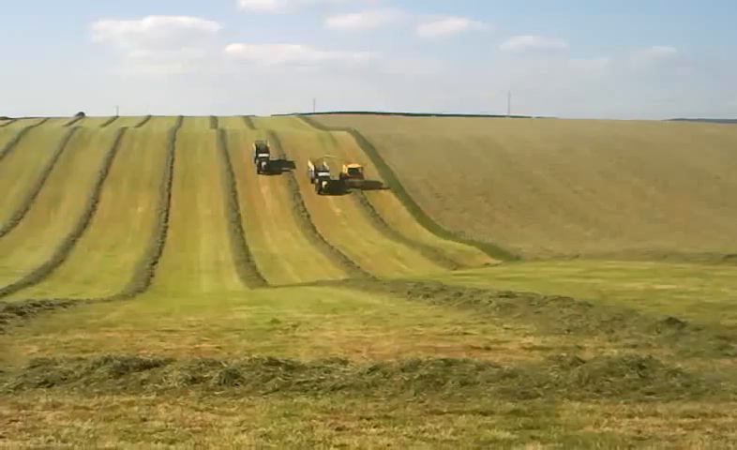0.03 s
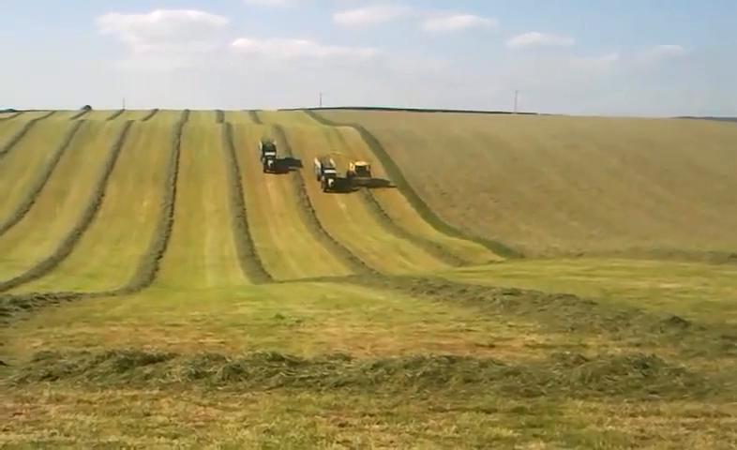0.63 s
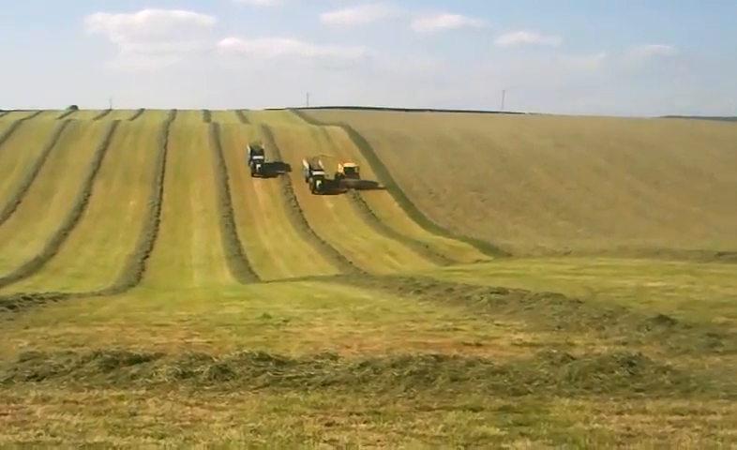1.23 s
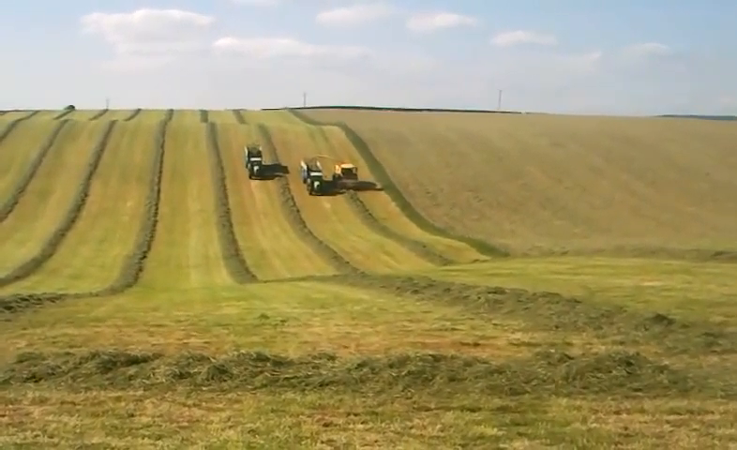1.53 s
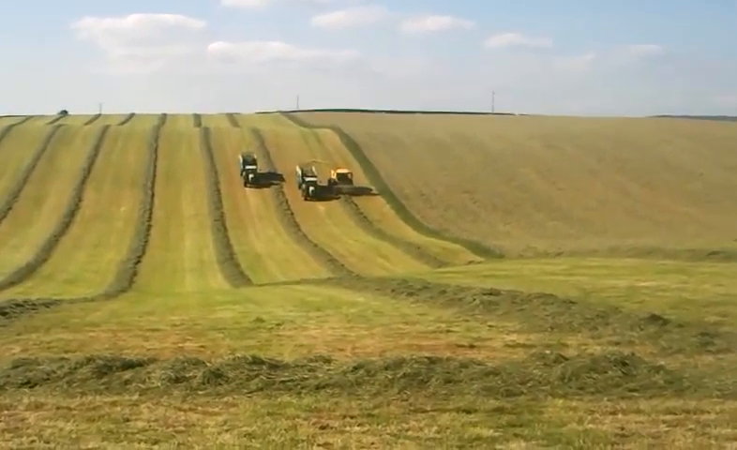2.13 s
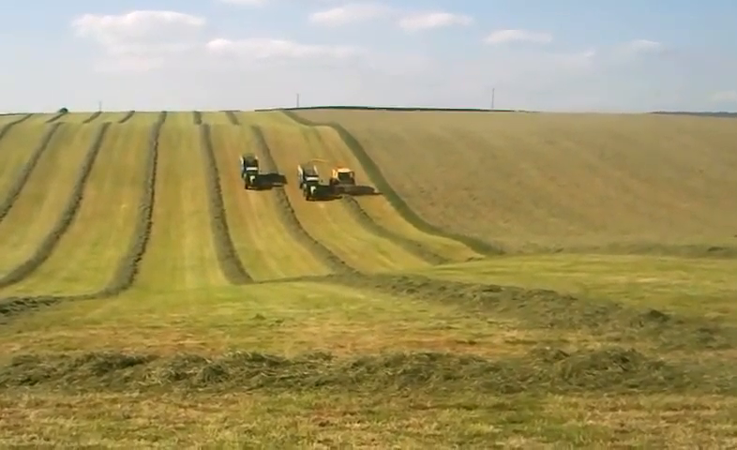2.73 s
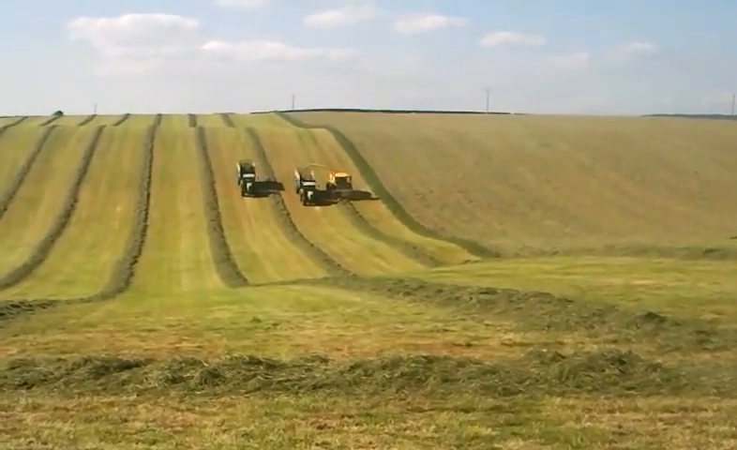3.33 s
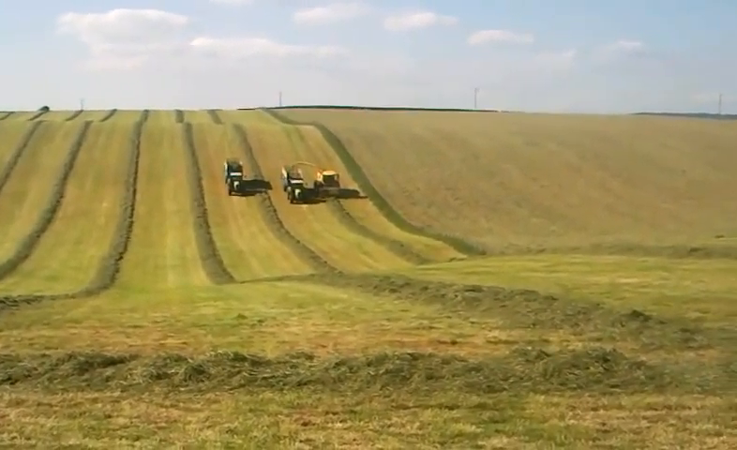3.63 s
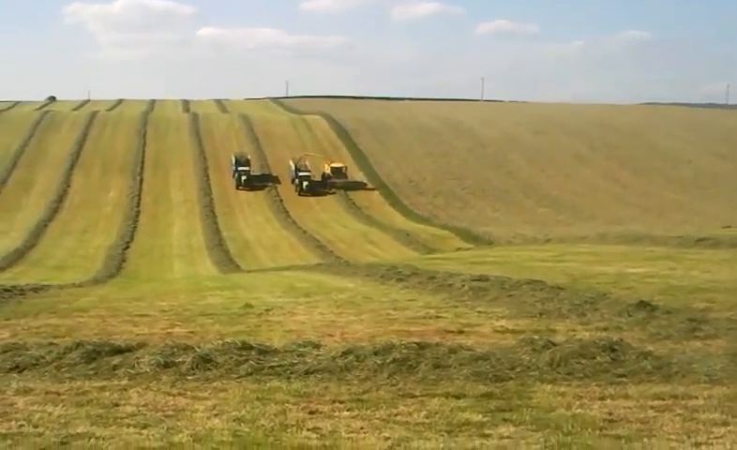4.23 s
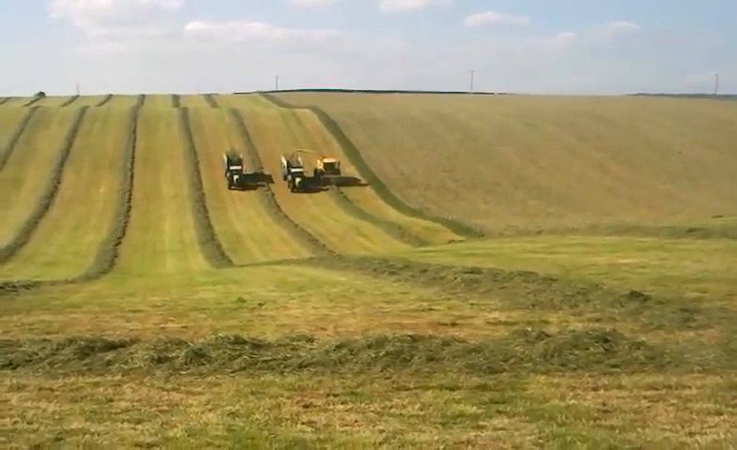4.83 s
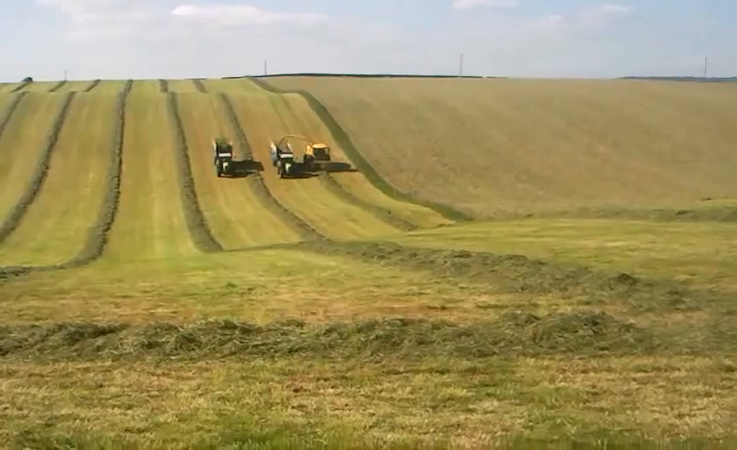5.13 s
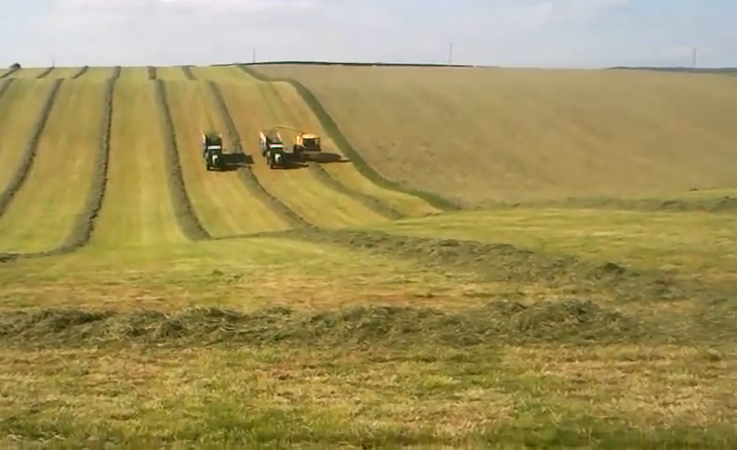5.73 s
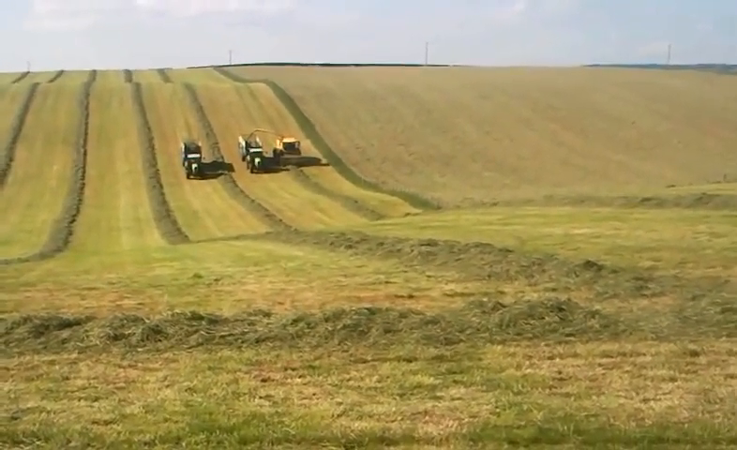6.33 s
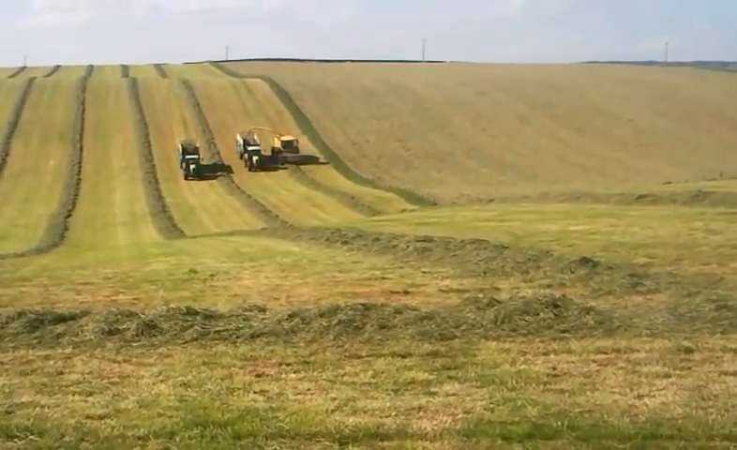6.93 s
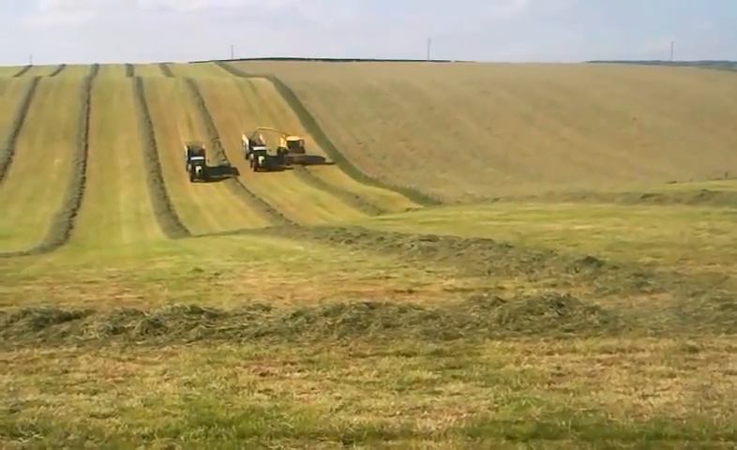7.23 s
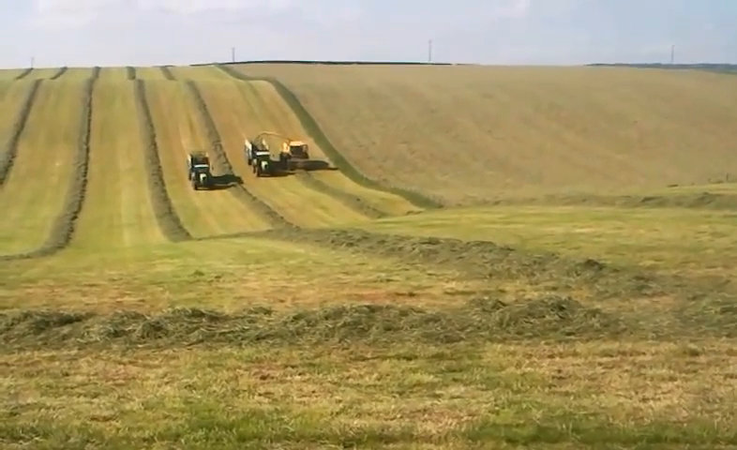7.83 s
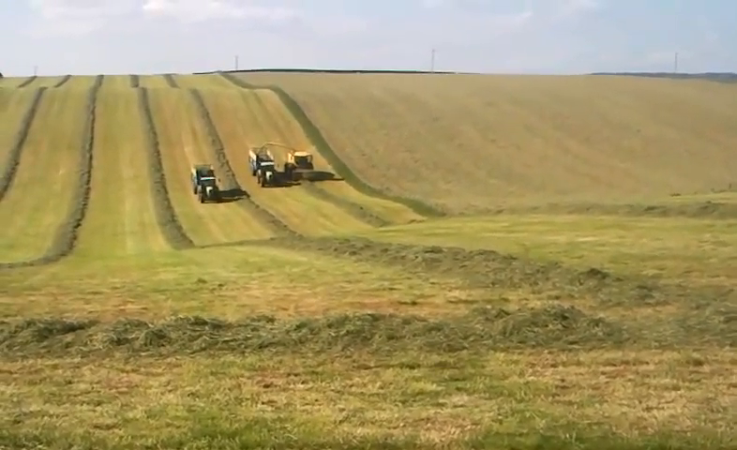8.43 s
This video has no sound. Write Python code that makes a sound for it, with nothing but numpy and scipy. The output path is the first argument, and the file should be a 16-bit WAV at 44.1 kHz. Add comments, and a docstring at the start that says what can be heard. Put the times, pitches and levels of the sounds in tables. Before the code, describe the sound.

A loud, brief pop with a crackle opens the sound as the microphone comes on. From then until the end, at about 8.5 seconds, two machines run over a steady low rumble in an open field. Close by, a diesel engine idles evenly, throbbing about seven times a second with a soft clatter, valve rattle and faint gear whine. Far off, a forage harvester chops grass: its engine drones, its cutter drum hums, and a rushing roar flutters, swelling and fading in the moving air. The harvester's tones repeatedly sag in pitch under load and recover, most deeply around 1 and 6.5 seconds. A higher blower note swells out around 3 to 3.6 seconds, and briefly near 4.1 and 8.2 seconds. The knives' whine stands out a little around 5 seconds. The sound is mono and narrow, with little treble.

```python
"""Distant forage harvester, diesel idling nearby

Far off on a grass slope a forage harvester is working: its cutter drum hums and sags as the swath loads
it, and its engine roar swells and fades in the moving air. A six-cylinder diesel idles close to the
narrow-band camera microphone, which comes on with a pop."""
import sys
import numpy as np
from scipy import signal
from scipy.fft import rfft, irfft, next_fast_len
from scipy.io import wavfile
from scipy.ndimage import uniform_filter1d, map_coordinates

SR = 44100
rng = np.random.default_rng(int(sys.argv[2]) if len(sys.argv) > 2 else 0)


def file_out(sig):
    """Save sig as 16-bit WAV at sys.argv[1]."""
    # one column per channel
    cols = np.atleast_2d(sig).T
    # limit, then scale
    lim = np.clip(cols, -1, 1)
    pcm = np.round(lim * 32767).astype(np.int16)
    wavfile.write(sys.argv[1], SR, pcm)


N = 374850
TIME = np.arange(N) / SR


def amp(db):
    """Decibels to gain."""
    return 10 ** (np.asarray(db) / 20)


def unit(x):
    """Scale to rms 1."""
    return x / np.sqrt(np.mean(x ** 2) + 1e-20)


def curves(rows):
    """One value per sample for each column after the time."""
    times, *columns = np.transpose(rows)
    return [np.interp(TIME, times, column) for column in columns]


def wobble(rate):
    """A smooth random curve, rate knots a second."""
    knots = rng.standard_normal(int(N * rate / SR) + 4)
    t = np.arange(0, N + 64, 64) / SR
    return np.interp(TIME, t, map_coordinates(knots, [t * rate], mode="nearest"))


def filtered(x, response):
    """Filter x by a gain given as a function of Hz."""
    size = next_fast_len(N + 8192)
    return irfft(rfft(x, size) * response(np.fft.rfftfreq(size, 1 / SR)), size)[:N]


def spectrum_gain(spectrum, hz):
    """The gain of a (Hz, dB) spectrum at hz."""
    points_hz, db = np.transpose(spectrum)
    return amp(np.interp(np.log(hz + 1), np.log(points_hz), db))


def noise(spectrum):
    """Noise of rms 1 with a (Hz, dB) spectrum."""
    return unit(filtered(rng.standard_normal(N), lambda hz: spectrum_gain(spectrum, hz)))


def resonance(hz, centre_hz, width_hz):
    """The gain of a steep-sided resonance."""
    return 1 / (1 + ((hz - centre_hz) / width_hz) ** 2) ** 2


def resonant(modes):
    """Noise of rms 1 gathered in resonances."""
    gain = lambda hz: sum(amp(db) * resonance(hz, centre, width) for centre, width, db in modes)
    return unit(filtered(rng.standard_normal(N), gain))


def patchy(x, depth_db):
    """x at rms 1 with short patches of random gain, a few hundred Hz wide."""
    bins = signal.stft(x, nperseg=512)[2]
    patches = uniform_filter1d(rng.standard_normal(bins.shape), size=3, axis=0)
    patches = uniform_filter1d(patches, size=5, axis=1)
    return unit(signal.istft(bins * amp(depth_db * unit(patches)), nperseg=512)[1][:N])


def tone(cycles, fade_db, smear, rate):
    """A sine of rms 1 whose level and phase flutter as it crosses turbulent air."""
    return unit(amp(fade_db * wobble(rate / 2)) * np.sin(2 * np.pi * cycles + smear * wobble(rate)))


# The field's background. Each row: frequency in Hz, relative level in dB.
RUMBLE_SPECTRUM = [(20, -31), (40, -21), (65, -6), (90, 0.5), (125, 0), (155, -2.5), (200, -2), (330, 1.5),
                   (400, -5), (520, -3), (730, -10.5), (1100, -7.5), (1600, -26.5), (2600, -25.5),
                   (4000, -56)]
def field_rumble():
    """The blended low roar of all the machines over the field."""
    return amp(-28.5 + 1.4 * wobble(9)) * noise(RUMBLE_SPECTRUM)


IDLE_HZ = 7.0842  # four-stroke cycles a second
# The near diesel's valve train. Each row: frequency in Hz, relative level in dB.
RATTLE_SPECTRUM = [(280, -7.5), (330, 2.5), (480, 3.5), (740, -4), (1080, 1.5), (1500, -14), (2200, -8),
                   (2600, -21.5), (3200, -22.5), (3800, -31.5), (4200, -58.5)]
def valve_rattle(cycles):
    """Valves and injectors strike the same parts in the same order, so one rattle recurs each cycle."""
    size = round(SR / IDLE_HZ)
    gain = spectrum_gain(RATTLE_SPECTRUM, np.fft.rfftfreq(size, 1 / SR))
    one_cycle = irfft(rfft(rng.standard_normal(size)) * gain, size)
    return amp(-37) * unit(map_coordinates(one_cycle, [cycles % 1 * size], mode="grid-wrap"))


# The timing gears' whine. Each row: frequency in Hz, relative level in dB.
GEAR_LINES = [(2153.7, -53), (2167.8, -52), (2171.3, -54.5)]
# A panel buzzing with them. Each row: centre in Hz, width in Hz, relative level in dB.
PANEL_MODES = [(2134, 120, 2), (3150, 170, -9.5)]
# Both at the microphone. Each row: time in seconds, gain in dB.
GEAR_GAIN = [(1.5, -0.5), (4, 3.5), (6, 3.5), (8.5, -2)]
def timing_gears(cycles):
    """The gears whine and buzz as they are loaded once a crank turn, every other turn harder."""
    whine = sum(amp(db) * tone(hz * TIME + rng.random(), fade_db=3.0, smear=0.44, rate=5.4)
                for hz, db in GEAR_LINES)
    cam_angle = 2 * np.pi * (cycles - 0.58) + 0.34 * wobble(7.8)
    load = unit(amp(2.5 * np.cos(cam_angle) + 6.4 * np.cos(2 * cam_angle)))
    buzz = amp(-50) * resonant(PANEL_MODES)
    return amp(curves(GEAR_GAIN)[0]) * load * (whine + buzz)


# The exhaust, close by. Each row: multiple of the cycle rate, level in dB.
EXHAUST_ORDERS = [(6, -49), (9, -52.5), (12, -47), (16, -40.5), (18, -40.5), (19, -41), (21, -38),
                  (22, -26.5), (23, -39), (24, -39.5), (26, -43.5), (27, -45), (28, -48), (36, -38),
                  (44, -43), (48, -50.5), (54, -51)]
# Firing clatter. Each row: frequency in Hz, relative level in dB.
CLATTER_SPECTRUM = [(300, -25.5), (800, -3.5), (1300, -10), (2200, -5.5), (2700, -12), (3250, -14.5),
                    (3900, -28), (4200, -50.5)]
# Two accessory hums that beat slowly. Each row: frequency in Hz, level in dB.
ACCESSORY_HUMS = [(211.83, -35), (212.52, -35.5)]
def idling_diesel():
    """A governed idle near the microphone: it throbs once a cycle and clatters softly once a firing."""
    cycles = IDLE_HZ * TIME + 0.0018 * wobble(3)
    throb_angle = 2 * np.pi * (cycles - 0.6855)
    exhaust = sum(amp(db) * np.cos(order * throb_angle + rng.normal(0, 0.35))
                  for order, db in EXHAUST_ORDERS)
    firing_decay = amp(-3 * (6 * cycles % 1))  # six cylinders
    clatter = amp(-43 + 1.1 * wobble(30)) * patchy(firing_decay * noise(CLATTER_SPECTRUM), depth_db=4.0)
    hum = sum(amp(db) * np.cos(2 * np.pi * hz * (TIME - 1.6))  # in phase at 1.6 s
              for hz, db in ACCESSORY_HUMS)
    return exhaust + clatter + hum + timing_gears(cycles) + valve_rattle(cycles)


# The far roar as the air carries it over.
# Each row: time in seconds, then relative levels in dB of body, howl, spout and crop rush.
ROAR_LEVELS = [(0.1, -23, -33, -34.5, -35.5), (0.48, -27.5, -23.5, -36, -31),
               (0.72, -25, -28.5, -31.5, -37.5), (1.1, -27, -29, -34.5, -40.5),
               (1.38, -33.5, -27.5, -35.5, -35.5), (1.8, -28, -28, -34.5, -43.5),
               (2.4, -27.5, -26.5, -34, -36), (2.96, -27.5, -24.5, -29.5, -31.5),
               (3.24, -27, -22.5, -28, -34), (3.38, -30.5, -24.5, -30, -35), (3.62, -25, -26, -29.5, -35),
               (3.92, -34.5, -27, -33, -34.5), (4.3, -28.5, -24.5, -30.5, -32), (5.3, -31, -27, -30, -31),
               (6.0, -32, -28, -31, -32), (6.3, -27, -25.5, -29, -33), (6.55, -33.5, -29, -32.5, -33),
               (7.15, -28, -28.5, -33, -30), (7.9, -27, -24.5, -29.5, -28),
               (8.06, -26, -27.5, -29.5, -27.5), (8.2, -23.5, -23.5, -28, -28),
               (8.33, -27, -25, -28.5, -27), (8.5, -30, -27, -27.5, -29.5)]
# Housing and spout resonances. Each row: centre in Hz, width in Hz, relative level in dB.
BODY_MODES = [(459, 55, -1.5), (547, 37, 0), (622, 91, 2.5)]
HOWL_MODES = [(793, 19, -7.5), (846.4, 83, -2.5), (887, 35, -6.5)]
SPOUT_MODES = [(1054, 130, 2), (1188, 130, 3), (1410, 150, 1.5), (1780, 210, -3.5), (2030, 140, -10.5)]
# The rush of crop. Each row: frequency in Hz, relative level in dB.
CROP_SPECTRUM = [(400, -32.5), (1000, 1.5), (1500, 3), (2200, 0.5), (2600, -14), (3200, -13), (3600, -26),
                 (3950, -27.5), (4200, -39)]
def harvester_roar():
    """Far up the field, chopped grass and blower air rush through the housing and spout."""
    body_db, howl_db, spout_db, crop_db = curves(ROAR_LEVELS)
    flutter = wobble(14)  # turbulence on the long path shakes all of it together
    wads = wobble(40)  # grass leaves the spout unevenly
    body = amp(body_db - 2.5 + flutter) * resonant(BODY_MODES)
    howl = amp(howl_db - 4.0 + 0.42 * flutter + wobble(26)) * resonant(HOWL_MODES)
    spout = amp(spout_db + 0.2 * flutter + 0.29 * wads) * patchy(resonant(SPOUT_MODES), depth_db=3.0)
    crop = amp(crop_db - 3.5 + 0.17 * flutter + 0.8 * wads) * patchy(noise(CROP_SPECTRUM), depth_db=3.5)
    return body + howl + spout + crop


# The far engine's drone and its third harmonic. Each row: time in seconds, level in dB.
DRONE_LEVEL = [(0.1, -39), (1.3, -42), (1.55, -34.5), (2.05, -30.5), (2.3, -43), (2.68, -33.5), (3.0, -41),
               (3.35, -32), (3.7, -32), (3.95, -40), (4.3, -37), (4.5, -29), (4.85, -33.5), (5.15, -29.5),
               (5.8, -34), (6.03, -39), (6.25, -31.5), (6.45, -39), (6.95, -39), (7.2, -30.5), (7.5, -28),
               (7.95, -31), (8.1, -36), (8.3, -28), (8.5, -30)]
DRONE_THIRD_LEVEL = [(0.25, -38), (1.5, -43), (2.5, -37.5), (3.8, -39), (4.5, -46.5), (6.4, -45.5),
                     (6.9, -39), (8.2, -38.5)]
def engine_drone(cuts):
    """The harvester's labouring engine drones an octave below the drum."""
    drone = amp(curves(DRONE_LEVEL)[0]) * tone(cuts / 2, fade_db=1.3, smear=0.22, rate=14)
    third = amp(curves(DRONE_THIRD_LEVEL)[0]) * tone(3 * cuts / 2, fade_db=2.5, smear=0.75, rate=28)
    return drone + third


# Tones in the howl and in the housing. Each row: multiple of the drum pitch, relative level in dB.
HOWL_ORDERS = [(3.5, -19), (4, -15)]
HOUSING_ORDERS = [(2, 0.5), (2.5, -3)]
# The housing's tones as the air carries them over. Each row: time in seconds, gain in dB.
HOUSING_GAIN = [(0.15, -21.5), (0.5, -36), (0.78, -24), (1.05, -20.5), (1.22, -31.5), (1.42, -26),
                (1.68, -43.5), (2.3, -31), (3.03, -28), (3.35, -36), (3.6, -28.5), (3.9, -40.5), (4.4, -32),
                (5.0, -36.5), (5.2, -41.5), (6.0, -40), (6.3, -28), (6.6, -40), (7.15, -34.5), (7.9, -36.5),
                (8.15, -23.5), (8.45, -44)]
def drum_overtones(pitch_hz, cuts):
    """Two tones ride on the howl; two more stand out while they lie in the drum housing's resonance."""
    howl = sum(amp(db) * tone(order * cuts, fade_db=3.5, smear=1.1, rate=30)
               for order, db in HOWL_ORDERS)
    housing = np.zeros(N)
    for order, db in HOUSING_ORDERS:
        ring = resonance(order * pitch_hz, centre_hz=613, width_hz=93)
        housing += amp(db) * ring * tone(order * cuts, fade_db=3.5, smear=0.5, rate=44)
    howl_db = curves(ROAR_LEVELS)[1]
    return amp(howl_db - 1) * howl + amp(curves(HOUSING_GAIN)[0]) * housing


# The blower's note from across the field. Each row: time in seconds, level in dB.
BLOWER_LEVEL = [(0.1, -40.5), (2.2, -41), (2.6, -31.5), (2.88, -22.5), (3.08, -21.5), (3.3, -28.5),
                (3.58, -24), (3.9, -37.5), (4.12, -28), (4.5, -42), (5.0, -42), (5.2, -33), (5.7, -35),
                (6.4, -44), (7.3, -35.5), (7.9, -44), (8.2, -26.5), (8.5, -44)]
def crop_blower(cuts):
    """Belted to the drum's shaft, the blower swells out of the howl, roughened by gulps of grass."""
    note = tone(2.805 * cuts, fade_db=1.2, smear=0.39, rate=44)
    gulps = unit(1 + 0.34 * np.cos(2 * np.pi * 10.2 * TIME + 1.9 * wobble(8)))
    return amp(curves(BLOWER_LEVEL)[0]) * gulps * note


# Wads of grass entering the drum. Each row: time of peak load in seconds, sag in Hz,
# slowing time and recovery time in seconds, the drum tone's level at full load in dB.
GRASS_WADS = [(0.159, 21.4, 0.307, 0.392, -24.5), (0.74, 11.5, 0.154, 0.187, -22.5),
              (1.059, 38.7, 0.292, 0.295, -26.0), (1.427, 13.9, 0.194, 0.296, -23.0),
              (2.044, 13.9, 0.212, 0.199, -26.0), (2.378, 7.6, 0.152, 0.298, -23.5),
              (3.256, 4.7, 0.161, 0.096, -21.5), (3.797, 15.4, 0.136, 0.129, -23.0),
              (4.263, 5.7, 0.079, 0.14, -21.5), (4.595, 17.3, 0.234, 0.379, -24.5),
              (5.138, 8.6, 0.252, 0.209, -23.5), (5.439, 8.3, 0.145, 0.086, -24.5),
              (6.446, 33.7, 0.236, 0.237, -30.0), (6.762, 11.7, 0.181, 0.229, -25.0),
              (7.394, 9.4, 0.246, 0.447, -27.0), (8.349, 11.9, 0.172, 0.3, -26.0)]
def drum_sag():
    """The pitch lost in Hz: each wad brakes the drum as it enters, then the governor answers."""
    sag_hz = np.zeros(N)
    for peak_s, depth_hz, slow_s, recover_s, _ in GRASS_WADS:
        width_s = np.where(TIME < peak_s, slow_s, recover_s)
        sag_hz += depth_hz * np.exp(-((TIME - peak_s) / width_s) ** 2)
    return sag_hz


# The knives' distant whine. Each row: time in seconds, level in dB.
KNIFE_LEVEL = [(0.1, -41), (0.35, -35), (0.8, -35.5), (2.0, -39.5), (3.0, -32.5), (3.55, -38.5),
               (3.8, -32.5), (4.0, -38), (4.3, -32.5), (5.0, -27.5), (5.35, -32), (5.7, -42), (8.0, -42),
               (8.4, -36)]
def cutter_drum(sag_hz, cuts, unloaded_drop_db=16, bite_hz=7.6):
    """The drum sings out as it bites into thick grass; its knives whine at the third harmonic."""
    hum_db = curves(GRASS_WADS)[-1] - unloaded_drop_db * np.exp(-sag_hz / bite_hz)
    hum = amp(hum_db) * tone(cuts, fade_db=2.0, smear=0.24, rate=28)
    whine = amp(curves(KNIFE_LEVEL)[0]) * tone(3 * cuts, fade_db=3.0, smear=0.7, rate=40)
    return hum + whine


def harvester_tones(unloaded_hz=305.5):
    """Drum, engine and blower turn together, so all their tones sag with the knife-passing pitch."""
    sag_hz = drum_sag()
    pitch_hz = unloaded_hz - sag_hz
    cuts = np.cumsum(pitch_hz) / SR  # knife passes so far
    drum = cutter_drum(sag_hz, cuts)
    return drum + engine_drone(cuts) + drum_overtones(pitch_hz, cuts) + crop_blower(cuts)


def scene():
    """From one spot on the slope, in mono: far harvester, near diesel and their common rumble."""
    return (harvester_tones() + harvester_roar() + idling_diesel() + field_rumble())[None]


def power_pop(swing_hz, width_s, swing_db, crackle_db):
    """The microphone amplifier settles with one heavy, brief swing and a crackle."""
    from_peak_s = TIME - 0.059
    swing = -np.cos(2 * np.pi * swing_hz * from_peak_s) * np.exp(-(from_peak_s / width_s) ** 2)
    age_s = np.maximum(TIME - 0.051, 0)
    decay = (age_s > 0) * amp(-60 * (age_s / 0.022) ** 2)
    crackle = decay * noise([(200, 7.0), (1300, -4.5), (1700, -9), (4000, -13.0), (4300, -29.0)])
    return amp(swing_db) * swing + amp(crackle_db) * crackle


def record(dry):
    """The camera microphone comes on, passes only a narrow band and clips at full scale."""
    on_s, wake_s = 0.046, 0.012
    mic_edge_hz, top_hz = 4150, 13500
    live = dry[0] * np.clip((TIME - on_s) / wake_s, 0, 1)
    live += power_pop(swing_hz=125, width_s=0.0056, swing_db=1, crackle_db=-3.5)
    narrow = filtered(live, lambda hz: np.clip((mic_edge_hz - hz) / 300 + 0.5, 0, 1))
    return filtered(np.clip(narrow, -1, 1), lambda hz: hz < top_hz)[None]


dry = scene()
out = record(dry)
file_out(out)
```